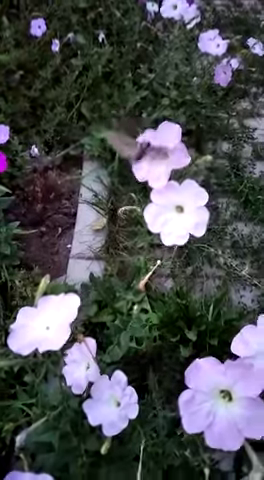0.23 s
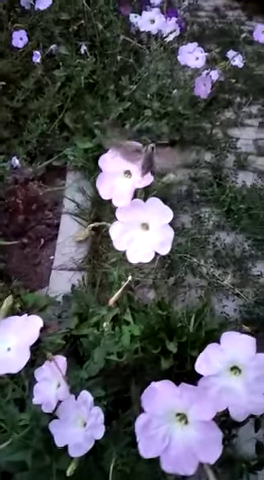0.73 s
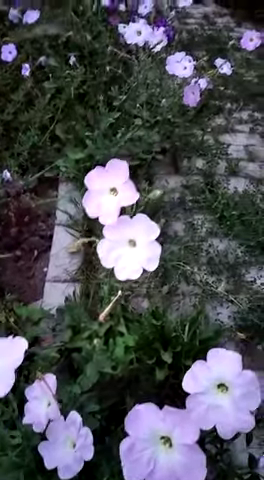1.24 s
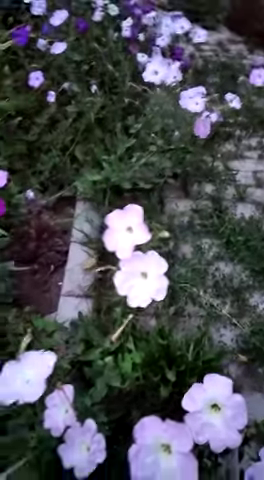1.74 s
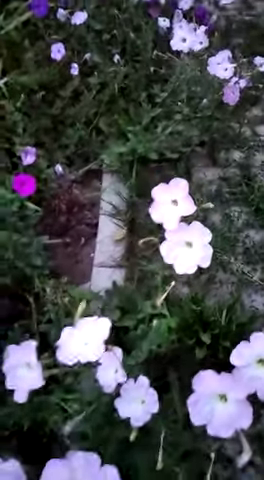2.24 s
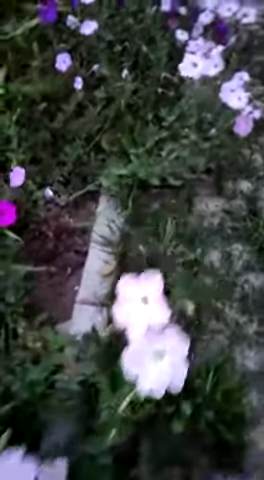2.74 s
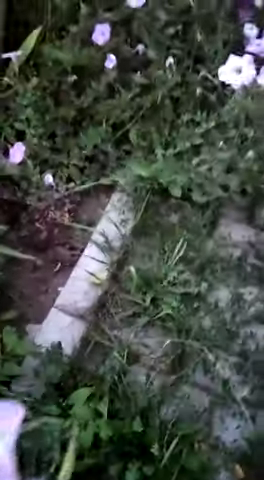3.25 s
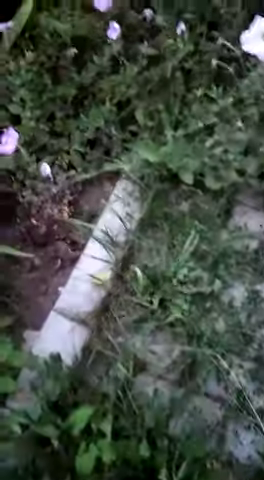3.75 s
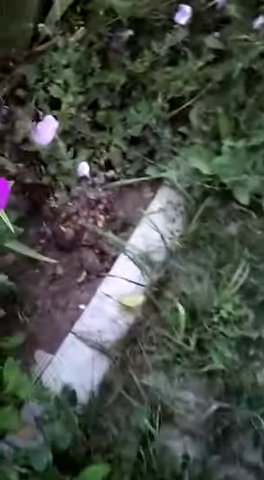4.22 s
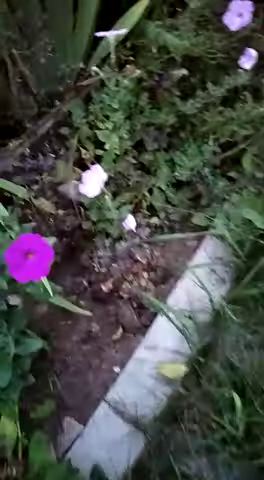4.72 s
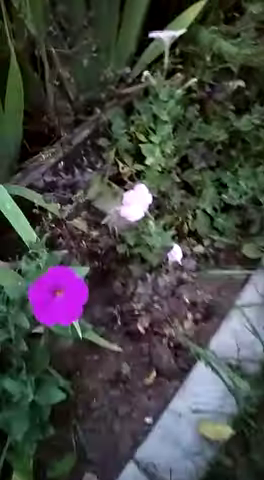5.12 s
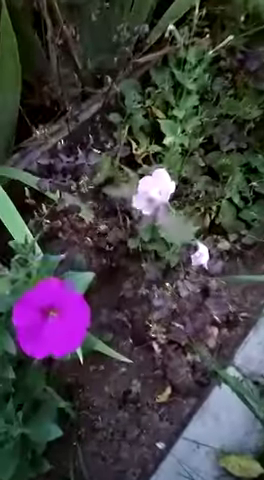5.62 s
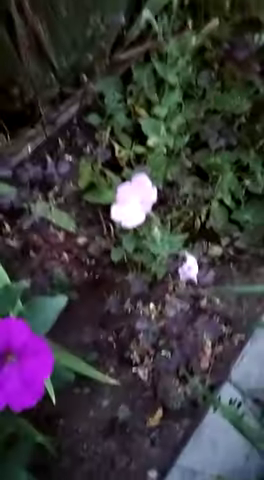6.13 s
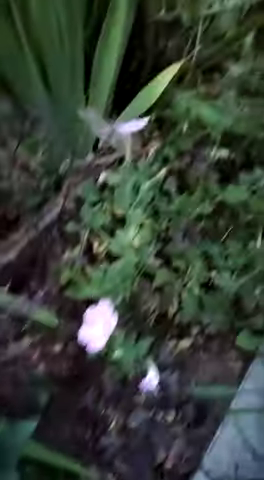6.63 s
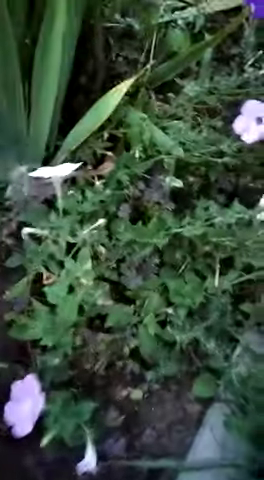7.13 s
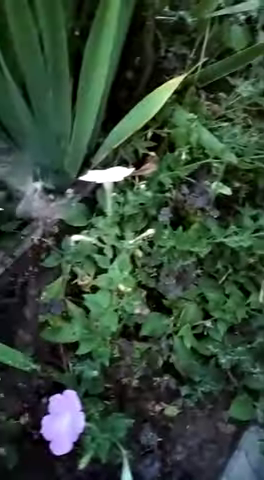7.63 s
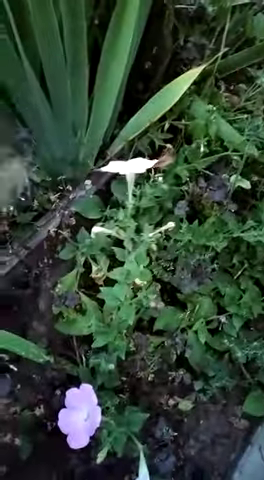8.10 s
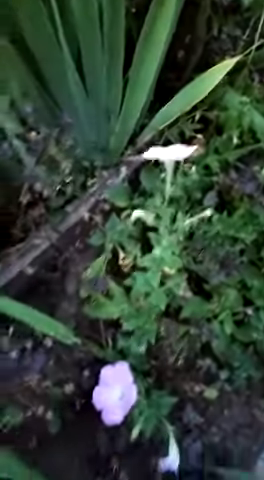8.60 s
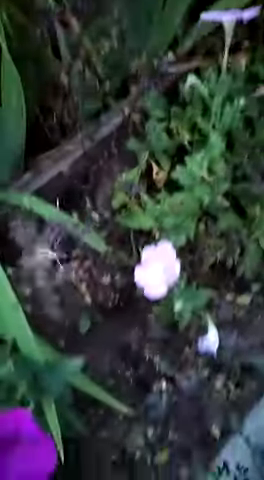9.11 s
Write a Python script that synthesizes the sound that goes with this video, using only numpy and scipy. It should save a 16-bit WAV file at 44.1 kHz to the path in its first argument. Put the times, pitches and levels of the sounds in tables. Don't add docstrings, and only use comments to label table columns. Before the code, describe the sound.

Outdoors in an evening garden, a bush cricket trills close by on the right, a rapid, high, silvery buzz. It stops before one second, swells back from about two, pauses again after six and returns near the end. A fainter cricket continues behind. Dull heel knocks come early, then feet crunch through dry leaves. Low distant town roar; handheld stereo microphones.

```python
import sys
import numpy as np
from scipy import signal
from scipy.io import wavfile
from scipy.ndimage import uniform_filter1d, map_coordinates

SR = 44100
rng = np.random.default_rng(int(sys.argv[2]) if len(sys.argv) > 2 else 0)


def invert_db(x):
    u = np.asarray(x, float) / 20
    return 10 ** u


def output_pcm(signal):
    pcm = np.clip(np.atleast_2d(signal).T, -1, 1) * 32767
    wavfile.write(sys.argv[1], SR, np.round(pcm).astype(np.int16))


N = 412817


def evened(x):
    return x / np.sqrt(np.mean(x ** 2) + 1e-20)


def smooth_noise(size):
    return evened(uniform_filter1d(rng.standard_normal(N), size=size))


def read(points, hz):
    f, value = np.transpose(points)
    return np.interp(np.log(hz + 1), np.log(f + 1), value)


def along(rows, outside=None):
    s, *columns = np.transpose(rows)
    return [np.interp(np.arange(N) / SR, s, c, outside, outside) for c in columns]


def ring(points, stretch=1.0):
    hz = abs(np.fft.fftfreq(2048, 1 / SR)) / stretch
    log_gain = np.log(invert_db(np.maximum(read(points, hz), -70)))
    minimum_phase = -signal.hilbert(log_gain).imag
    taps = np.fft.ifft(np.exp(log_gain + 1j * minimum_phase)).real[:1024]
    return taps / np.linalg.norm(taps)


def sides(pan_db):
    return invert_db(np.array([pan_db / 2, -pan_db / 2]))


# frequency in Hz, left minus right in dB.
LEFT_TILT = [(60, 4), (200, 7), (380, 4), (700, -2), (2400, 0.5), (9500, -2.5), (11000, 5.5), (14000, 1.5)]


def hiss(points, same, patchy_db, size=1024):
    frames, hz = 4 * N // size + 5, np.fft.rfftfreq(size, 1 / SR)
    a, b, c, d, patches = rng.standard_normal((frames, len(hz), 5)).T
    patches = uniform_filter1d(patches, size=10, axis=0)
    patches = evened(uniform_filter1d(patches, size=14, axis=1))
    same = np.clip(same * np.ones(len(hz)), -1, 1)[:, None]
    left, other = a + 1j * b, c + 1j * d
    z = np.array([left, same * left + np.sqrt(1 - same ** 2) * other])
    z *= invert_db(read(points, hz)[:, None] + patchy_db * patches)
    z *= sides(read(LEFT_TILT, hz))[:, :, None]
    return evened(signal.istft(z, nperseg=size, noverlap=3 * size // 4)[1][:, :N])


def stroke(beat, lead, sharp):
    turns = beat * np.arange(N) / SR + along(lead)[0]
    return np.exp(sharp * (np.cos(2 * np.pi * turns) - 1)), np.round(turns).astype(int)


def plants(x, t60):
    taps = np.zeros((2, 12000))
    at = np.arange(60, 11980, 20) + rng.integers(0, 20, (2, 596))
    np.put_along_axis(taps, at, rng.choice([-1., 1.], at.shape), 1)
    taps *= invert_db(-60 * np.arange(12000) / SR / t60)
    return signal.oaconvolve(x[None], taps / np.linalg.norm(taps[0]), axes=1)[:, :N]


# time in seconds, left lag in samples.
LEFT_LAG = [(0, 8), (.8, 8), (2.3, 13), (4, 16.7), (5.7, 18.6), (9.36, 18.6)]


def late(x):
    return map_coordinates(x, [np.arange(N) - along(LEFT_LAG)[0]], order=3)


# time in seconds, pitch in Hz.
WING_PITCH = [(0, 8280), (.77, 8240), (2, 7950), (3.5, 8200), (5, 8247), (6.4, 8210), (8.2, 7920),
              (9.36, 8280)]
WING_WOBBLE = 0.007
TOOTH_S = .00055
OVERTONE, OVERTONE_DB = 1.292, -19.5


def tooth(teeth):
    wobble = uniform_filter1d(uniform_filter1d(rng.standard_normal(N), size=100), size=100)
    pitch_hz = along(WING_PITCH)[0] * (1 + WING_WOBBLE * evened(wobble))
    angle = 2 * np.pi * np.cumsum(pitch_hz) / SR
    swell = np.exp(-.5 * (np.arange(-100, 101) / SR / TOOTH_S) ** 2)
    swell = np.sqrt(2) * swell / np.linalg.norm(swell)
    out = np.zeros(N)
    for ratio, db in [(1, 0), (OVERTONE, OVERTONE_DB)]:
        turn = np.exp(1j * ratio * angle)
        out += invert_db(db) * (turn * signal.oaconvolve(teeth / turn, swell, "same")).imag
    return out


# time in seconds, effort in dB, left minus right in dB.
TRILL_EFFORTS = [
    [(0, -27.5, -10), (.3, -30.5, -9.5), (.77, -30.5, -10.5)],
    [(1.95, -61, -5), (2.06, -46, -5), (2.6, -34.5, -9), (3.1, -32.5, -1.5), (3.55, -28.5, -1),
     (4.3, -28.5, -14), (5, -30, -11), (5.6, -31, -10), (6.39, -31, -4.5)],
    [(8.17, -54, -15), (8.3, -37, -29), (8.8, -33, -7), (9.36, -33.5, -8)],
]
# time in seconds, lead on the steady beat in strokes.
NEAR_STROKE_LEAD = [(0, -.08), (.3, -.11), (.55, -.18), (.77, -.48), (2, -1.26), (2.3, -1.04), (2.7, -.9),
                    (3.1, -.68), (3.3, -.64), (3.6, -.71), (4.3, -.93), (4.7, -.9), (5.3, -.74), (5.7, -.7),
                    (6, -.79), (6.4, -1.18), (8.2, -2.42), (9.36, -1.55)]
# level in dB, one a trill.
UPPER_LEVELS = [-31, -35.5, -38.5]
# frequency in Hz, density in dB per Hz.
UPPER_TONE = [(7200, -36), (8300, 3.5), (9500, -4.5), (10000, -3), (10300, 0), (10750, -5), (12000, -13),
              (14400, -17)]
# time in seconds, level in dB.
TOP_LEVEL = [(0, -6), (.8, -9), (2, -3), (4, 2), (6.4, 0), (8.2, 1), (9.36, 3.5)]
# frequency in Hz, density in dB per Hz.
SCRAPER_TONE = [(3500, -40), (4500, -4), (5500, -1), (6500, -1), (7200, 2), (8000, -32)]
NEAR_BEAT = 30.
UPPER_FOLLOWS, MEAN_EFFORT_DB = 0.23, -26.5
TOP_HZ = 10800
SCRAPER_DB, CATCH_DB = -40, 5
TEETH_PER_STROKE, TOOTH_SLIP = 12.3, .18


def near_singer():
    effort, upper = np.zeros(N), np.zeros(N)
    pan_db = along(sum(TRILL_EFFORTS, []))[1]
    for rows, upper_db in zip(TRILL_EFFORTS, UPPER_LEVELS):
        effort_db = along(rows, -900)[0]
        effort += invert_db(effort_db)
        follow_db = UPPER_FOLLOWS * (effort_db - MEAN_EFFORT_DB)
        upper += invert_db(upper_db + follow_db) * np.minimum(invert_db(effort_db + 45.0), 1)
    effort, upper = uniform_filter1d([effort, upper], size=300)

    press, count = stroke(NEAR_BEAT, NEAR_STROKE_LEAD, sharp=2.6)
    strength = invert_db(0.27 * rng.standard_normal(400)[count])
    within = NEAR_BEAT * np.arange(N) / SR + along(NEAR_STROKE_LEAD)[0] - count
    place = TEETH_PER_STROKE * within + TOOTH_SLIP * rng.standard_normal(400)[count]
    place += .05 * smooth_noise(150)
    teeth = np.diff(np.maximum.accumulate(np.floor(place) + 20 * count), prepend=0) == 1
    teeth = evened(teeth * invert_db(1.95 * rng.standard_normal(N)) * (press + 0.01))

    clicks = tooth(teeth * effort * strength)
    catch = invert_db(CATCH_DB * rng.standard_normal(400)[count])
    ticks = signal.oaconvolve(teeth * effort * press * catch, ring(SCRAPER_TONE))[:N]
    clicks += invert_db(SCRAPER_DB) * ticks
    shade = invert_db(np.array([pan_db, 0 * pan_db]))
    direct = np.array([late(clicks), clicks]) * shade

    broad = np.array([stroke(NEAR_BEAT, NEAR_STROKE_LEAD, sharp)[0] for sharp in (0.33, 0.92)])
    slips = hiss(UPPER_TONE, .5, patchy_db=1.5, size=256)
    top = signal.sosfiltfilt(signal.butter(4, TOP_HZ, "highpass", fs=SR, output="sos"), slips)
    left, right = slips + (invert_db(along(TOP_LEVEL)[0]) - 1) * top
    scrape = upper * strength * broad * sides(-5.0)[:, None] * np.array([late(left), right])

    close = invert_db(-11) * shade * plants(clicks, t60=.022)
    garden = invert_db([[-16], [-12]]) * plants(invert_db(-1.0) * clicks + scrape[1], t60=0.35)
    return invert_db(-4.5) * direct + close + garden + scrape


# time in seconds, level in dB.
FAR_LEVEL = [(0, -53.5), (1.9, -52), (6.7, -68.5), (7.2, -63.5), (9.36, -54)]
# time in seconds, lead on the steady beat in strokes.
FAR_STROKE_LEAD = [(0, .23), (9.36, .31)]
# frequency in Hz, density in dB per Hz.
FAR_COLOR = [(6800, -46), (7400, -4.5), (7900, 8.5), (8700, 10), (9500, 4), (10500, -1), (12000, -56),
             (14500, -34)]
# frequency in Hz, density in dB per Hz.
CROWD_COLOR = [(5000, -46), (6000, -61), (6800, -17), (7800, 5), (10400, 7), (12000, -6.5), (14400, -9.5)]
FAR_BEAT = 29.2
CHORUS_DB, CHORUS_FOLLOWS, MEAN_FAR_DB = -54.5, 0.19, -64.5


def chorus():
    far_db = along(FAR_LEVEL)[0]
    throb = evened(stroke(FAR_BEAT, FAR_STROKE_LEAD, sharp=1.0)[0])
    far = invert_db(far_db) * throb * sides(-4.5)[:, None] * hiss(FAR_COLOR, 0.31, patchy_db=2.5, size=256)
    blur = invert_db(CHORUS_DB + CHORUS_FOLLOWS * (far_db - MEAN_FAR_DB))
    return far + blur * sides(.6)[:, None] * hiss(CROWD_COLOR, 0.042, patchy_db=0.5, size=256)


# start in seconds, length in seconds, crunch in dB.
FOOT_DRAGS = [(1.974, 0.16, -46.5), (2.27, 0.28, -46.5), (2.59, 0.31, -50), (3.008, 0.14, -55.5),
              (3.194, 0.13, -51), (3.656, 0.024, -54), (3.78, 0.28, -50.5), (4.166, 0.054, -65),
              (4.27, 0.17, -50), (4.495, 0.28, -61), (4.84, 0.12, -55), (8.2, 0.28, -63)]
STEP_RISE_DB_PER_S, STEP_HOLD_LOSS_DB_PER_S, STEP_FALL_DB_PER_S = 355, -1, 253
STEP_FLICKER_DB = 2


def drag():
    t, out = np.arange(N) / SR, np.zeros(N)
    for s, length, db in FOOT_DRAGS:
        rise_db = STEP_RISE_DB_PER_S * np.maximum(s - t, 0)
        hold_loss_db = STEP_HOLD_LOSS_DB_PER_S * np.maximum(t - s, 0)
        fall_db = STEP_FALL_DB_PER_S * np.maximum(t - s - length, 0)
        out += invert_db(db - rise_db - hold_loss_db - fall_db)
    return out * invert_db(STEP_FLICKER_DB * smooth_noise(900))


# start in seconds, peak in dB, treble in dB.
LEAF_SNAPS = [(0.58, -51, -38), (0.6, -45.5, -36), (0.7218, -54.5, -30), (0.9418, -48, -32),
              (1.2955, -51, -36), (1.5808, -62, -30), (1.6501, -65, -34), (1.8612, -65, -28),
              (1.8886, -52, -29), (1.9749, -73, -21), (2.118, -50, -13), (2.1824, -53, -18),
              (2.2568, -51, -24), (2.3875, -53, -21), (2.4824, -52, -22), (2.6125, -48, -31),
              (2.7831, -57, -38), (2.899, -41, -39), (2.9966, -59, -21), (3.3707, -51.5, -27),
              (3.4436, -57, -24), (3.782, -37, -22), (3.969, -49, -20), (4.0906, -64, -22),
              (4.1347, -46.5, -24), (4.1884, -57, -5.5), (4.2353, -61, -22), (4.279, -42.5, -15.5),
              (4.8594, -57, -17), (6.9294, -70, -25), (7.23, -54, -33), (7.5128, -57, -28)]
# start in seconds, peak in dB.
STROKE_TICKS = [
    (0.1316, -64),
    (0.1671, -68),
    (0.2025, -63),
    (0.2998, -65),
    (0.3322, -68),
    (0.3995, -66),
    (0.5362, -69),
    (0.5896, -67),
    (0.6435, -59),
]
# frequency in Hz, density in dB per Hz.
LEAF_BODY = [(700, -9.5), (1300, 2.5), (2300, 6), (3300, 7), (4500, -13.5), (7000, -17.5)]
# frequency in Hz, density in dB per Hz.
LEAF_CRISP = [(1000, -17), (2000, -19.5), (3500, 1), (5000, -13), (6800, -5.5), (10000, -2), (14000, -1),
              (14800, -70)]
STEP_BODY_DB = -8
CRACK_DB, CRACK_T60_S = 5, .025
RIGHT_LATE, LEAF_SAME = 19, .85
SHADE = 0.51


def leaves():
    grains = invert_db(5.2 * np.minimum(rng.exponential(1, (2, N)), 4))
    grains *= rng.random((2, N)) < 2000 / SR
    grains = evened(grains * rng.choice([-1., 1.], (2, N)))
    high, t = drag(), np.arange(4000) / SR
    low = invert_db(STEP_BODY_DB) * high
    for s, db, treble_db in LEAF_SNAPS:
        burst = invert_db(db - 10.0 - 60 * np.maximum(t - .015, 0) / 0.22) * np.minimum(t / 0.00046, 1)
        burst += invert_db(db - 12.0 + CRACK_DB - 60 * t / CRACK_T60_S)
        low[round(s * SR):][:len(t)] += burst
        high[round(s * SR):][:len(t)] += burst * invert_db(treble_db + 24.0)
    for s, db in STROKE_TICKS:
        high[round(s * SR):][:len(t)] += invert_db(db - 5.0 - 60 * t / .02)
    crackle = signal.oaconvolve(grains * low, ring(LEAF_BODY)[None])
    crackle += signal.oaconvolve(grains[::-1] * high, ring(LEAF_CRISP)[None])
    left, other = crackle[:, :N]
    right = LEAF_SAME * np.roll(left, shift=RIGHT_LATE) + np.sqrt(1 - LEAF_SAME ** 2) * other
    shaded = signal.lfilter([1 - SHADE], [1, -SHADE], right)
    return np.array([left, shaded]) * sides(-0.091)[:, None]


# start in seconds, peak in dB.
HEEL_KNOCKS = [
    (.585, -52),
    (.6, -43),
    (.69, -44),
    (.722, -42.5),
]
THUD_HZ, THUD_T60_S = 480, 0.079


def heel():
    out, t = np.zeros(N), np.arange(4000) / SR
    for s, db in HEEL_KNOCKS:
        tone = np.sin(2 * np.pi * THUD_HZ * rng.uniform(.9, 1.15) * t)
        out[round(s * SR):][:len(t)] += invert_db(db - 60 * t / THUD_T60_S) * tone
    return out * sides(2.5)[:, None]


# frequency in Hz, density in dB per Hz.
ROAR_TONE = [(200, -21), (400, -5.5), (750, -3), (1100, -3), (2500, -15.5), (3500, -19.5), (4800, -38.5),
             (14500, -62)]
# frequency in Hz,
# left-right likeness.
ROAR_LIKENESS = [(200, .85), (600, .55), (850, .1), (1200, -.45), (2200, -.15), (5000, 0)]
# frequency in Hz, density in dB per Hz.
RUMBLE_TONE = [(25, -33), (50, -14), (100, -2), (230, -2), (330, -5.5), (500, -10.5), (900, -22),
               (1500, -71)]
# frequency in Hz, left-right likeness.
RUMBLE_LIKENESS = [(30, .7), (60, 0.99), (150, 0.86), (380, 0.88), (950, 0.32), (2370, -0.034),
                   (5960, 0.0053), (14900, -0.22)]
# frequency in Hz, density in dB per Hz.
TYRE_TONE = [(400, -24), (550, -1), (650, -2.5), (770, -1), (880, -4.5), (1100, -7), (1400, -64)]
# frequency in Hz, density in dB per Hz.
WHINE_TONE = [(690, -40), (750, 0), (810, -40)]
# time in seconds, level in dB.
BREEZE_LEVEL = [
    (0, -71),
    (8.2, -84),
    (8.7, -62),
    (9.36, -64),
]
# frequency in Hz, density in dB per Hz.
BREEZE_COLOR = [(20, -6), (40, 0), (80, 10), (150, 1), (250, -35)]
ROAR_DB, RUMBLE_DB, RUMBLE_RISE_DB_PER_S = -53, -57, 0.2235
HUM_HZ, HUM_WIDTH_HZ, HUM_DB = 117, 5, -66
PASS_DB, PASS_S, PASS_SPAN_S = -51.5, 1.4, 1.54
WHINE_DB = -9


def town():
    t, hz = np.arange(N) / SR, np.fft.rfftfreq(2048, 1 / SR)
    wide = read(ROAR_LIKENESS, hz)
    roar = invert_db(ROAR_DB) * hiss(ROAR_TONE, wide, patchy_db=1.5, size=2048)
    rumble = invert_db(RUMBLE_DB + RUMBLE_RISE_DB_PER_S * t) * hiss(
        RUMBLE_TONE, read(RUMBLE_LIKENESS, hz), patchy_db=1.0, size=2048)
    line, skirt = [], 2 * HUM_WIDTH_HZ
    for center, db in [(HUM_HZ, 0), (2 * HUM_HZ, -2)]:
        line += [(center - skirt, -40), (center, db), (center + skirt, -40)]
    drone = invert_db(HUM_DB) * hiss(line, 0.7, patchy_db=4.0, size=8192)
    vehicle = hiss(TYRE_TONE, wide, patchy_db=-0.5, size=2048)
    vehicle += invert_db(WHINE_DB) * hiss(WHINE_TONE, 0.17, patchy_db=3.5, size=8192)
    vehicle *= invert_db(PASS_DB) / np.hypot(1, (t - PASS_S) / PASS_SPAN_S)
    breeze = invert_db(along(BREEZE_LEVEL)[0]) * hiss(BREEZE_COLOR, 0.76, patchy_db=1.0, size=2048)
    return roar + rumble + drone + vehicle + breeze


def scene():
    return near_singer() + chorus() + leaves() + heel() + town()


# frequency in Hz, odds in standard deviations.
MUTE_ODDS = [(1400, -2.6), (2000, -1), (2700, -.4), (3700, 0), (4300, .4), (5200, .65), (5900, .15),
             (6400, .2), (7200, -.5), (7600, -3.5), (10500, -3), (11800, -1.2), (14200, -.3)]
# starved from in Hz, loud from in Hz, loud to in Hz,
# threshold in dB, odds per dB, edge drift in Hz, own level that saves it in dB.
LOUD_MASKS = [(6300, 7500, 12000, -47, .13, 70, -65), (3170, 3580, 6000, -69, .4, 140, 0)]
SAVED_PER_DB, SAVED_BELOW_HZ = .045, 6300


def starve(x):
    hz, t, z = signal.stft(x, SR, nperseg=2048, noverlap=1536, boundary="even")
    band, frame = np.arange(len(hz)) // 5, np.arange(len(t)) // 2
    luck = rng.standard_normal((len(hz), len(t)))
    luck = evened(uniform_filter1d(luck, size=2, axis=1))[:, frame]
    luck, wide = luck[band], luck[band // 3 * 3]
    odds = read(MUTE_ODDS, hz)[:, None] + np.zeros(len(t))
    power = (abs(z) ** 2).sum(0)
    level = 10 * np.log10(uniform_filter1d(power, size=25, axis=0) + 1e-14)
    swell_db = np.clip(level - np.median(level, axis=1, keepdims=True), -6, 10)
    odds -= SAVED_PER_DB * swell_db * (hz[:, None] < SAVED_BELOW_HZ)

    def band_db(a, b, size):
        inside = power[(hz > a) & (hz < b)].sum(0)
        return 10 * np.log10(uniform_filter1d(inside, size=size) + 1e-12)

    for low, edge, high, from_db, slope, drift_hz, own_db in LOUD_MASKS:
        loud, own = band_db(edge, high, 7), band_db(low, .93 * edge, 3)
        drift = evened(uniform_filter1d(rng.standard_normal(len(t)), size=3))
        shift = drift_hz * np.round(drift)[frame]
        under = (hz[:, None] > low + shift) & (hz[:, None] < edge + shift)
        odds += under * (slope * np.maximum(loud - from_db, 0) - .25 * np.maximum(own - own_db, 0))
        luck = np.where(under, wide, luck)
    return signal.istft(z * (luck > odds), SR, nperseg=2048, noverlap=1536)[1][:, :N]


def top_cut(x):
    return signal.sosfilt(signal.butter(12, 15540, fs=SR, output="sos"), x)


def record(dry):
    cut = signal.sosfilt(signal.butter(2, 45, "highpass", fs=SR, output="sos"), dry)
    lowpass = signal.firwin(151, 14220, window=("kaiser", 8), fs=SR)
    limited = signal.oaconvolve(cut, lowpass[None], "same")
    mix = starve(limited)
    return top_cut(mix)


dry = scene()
out = record(dry)
output_pcm(out)
```